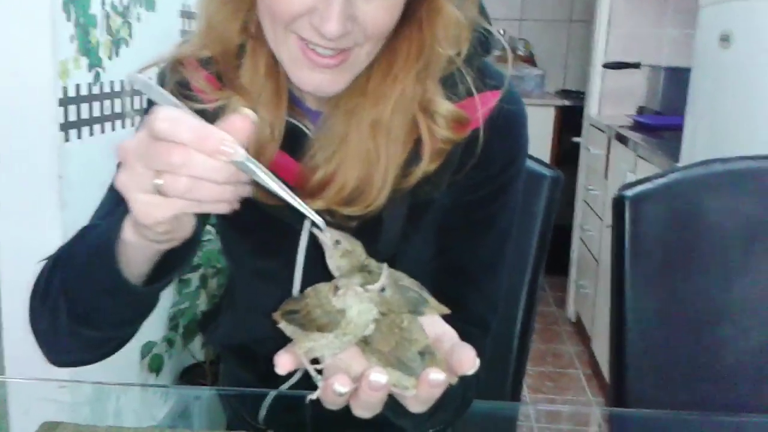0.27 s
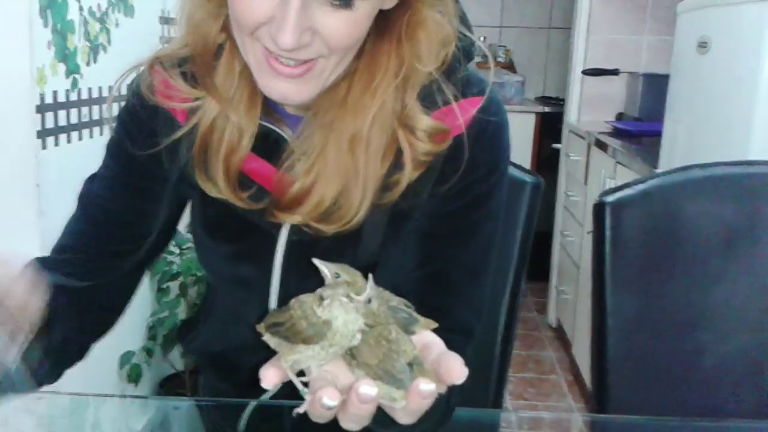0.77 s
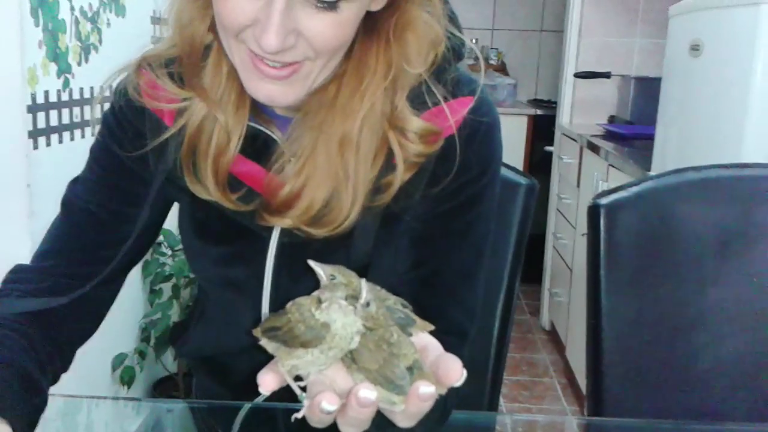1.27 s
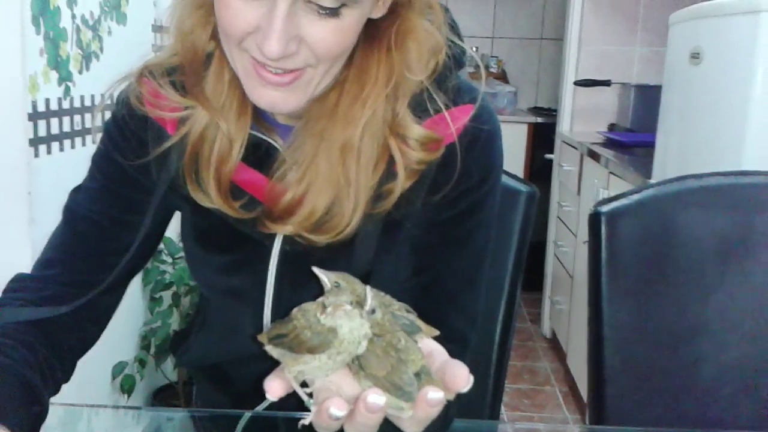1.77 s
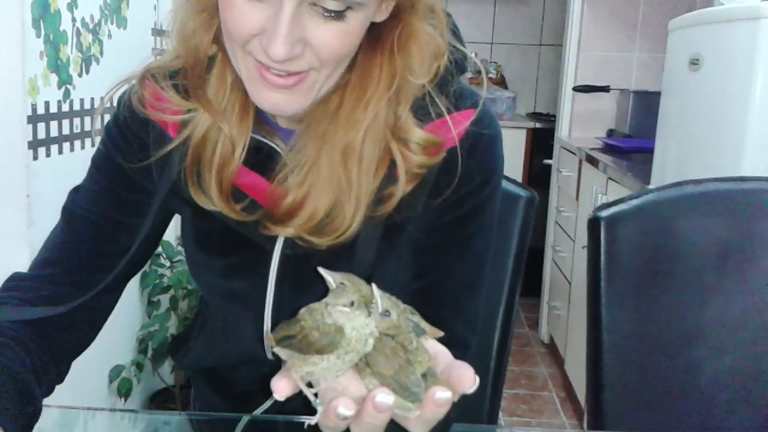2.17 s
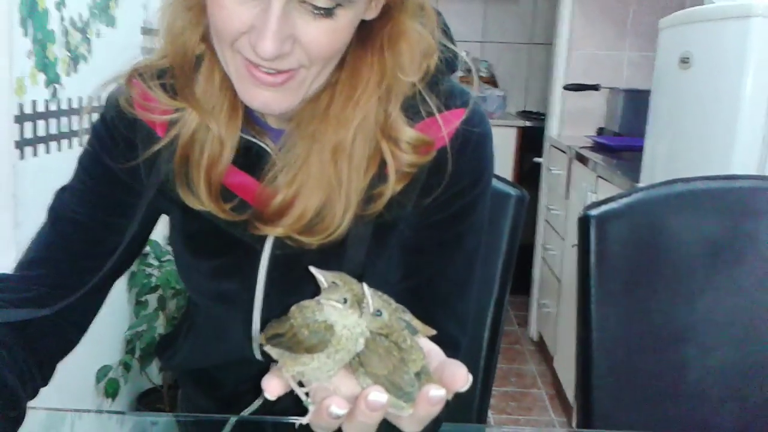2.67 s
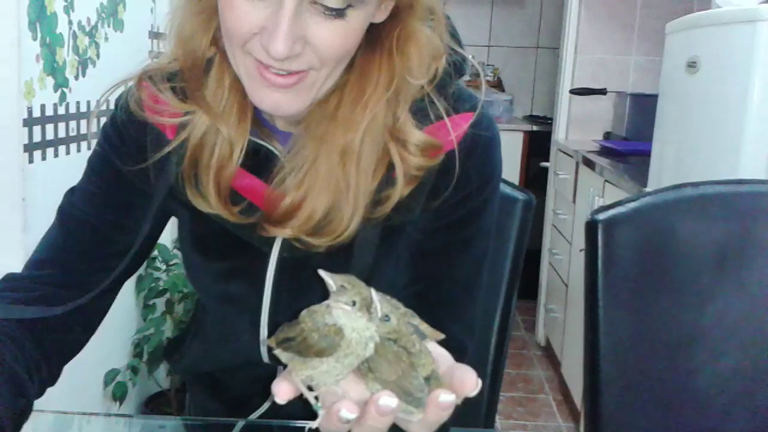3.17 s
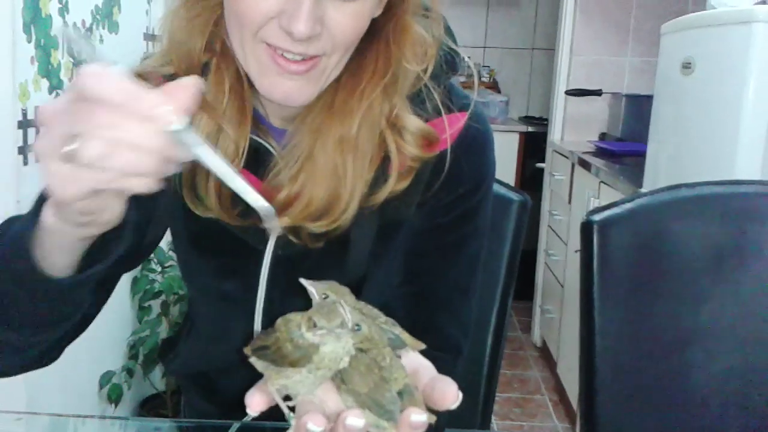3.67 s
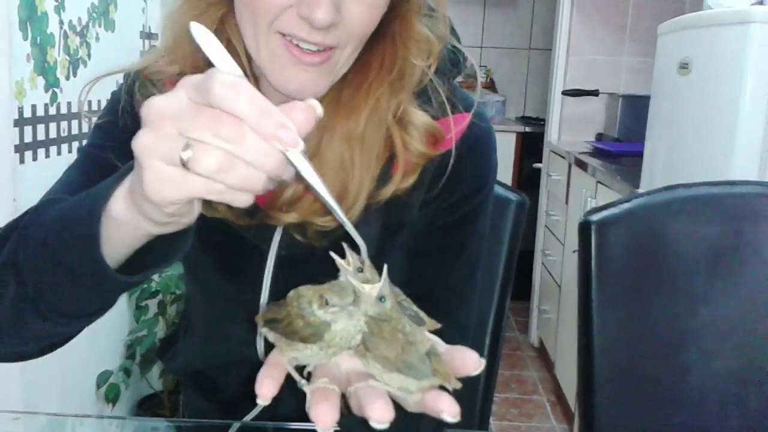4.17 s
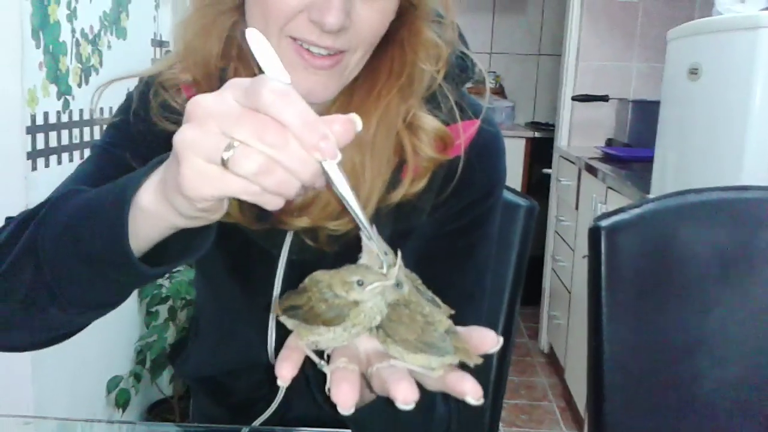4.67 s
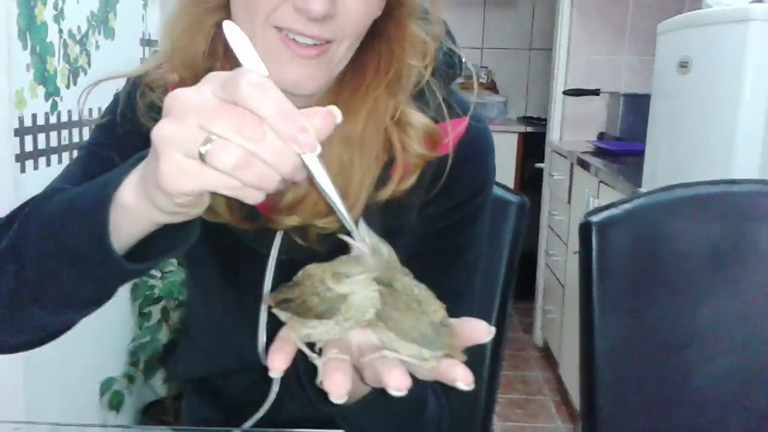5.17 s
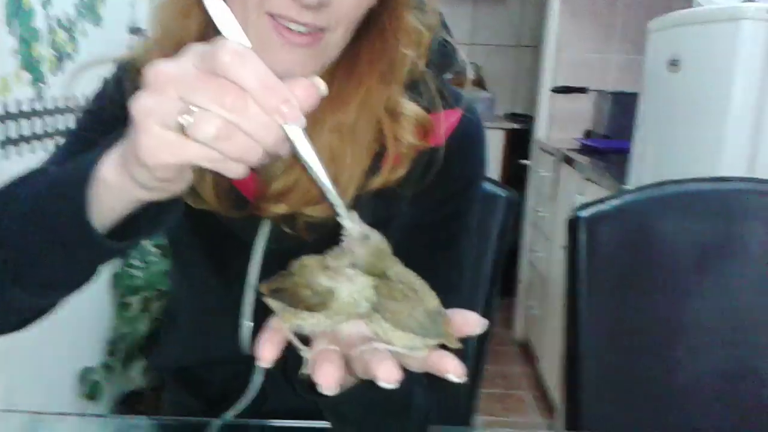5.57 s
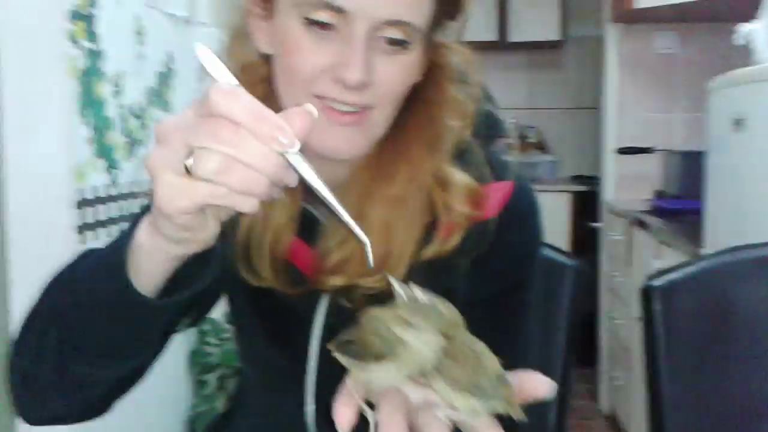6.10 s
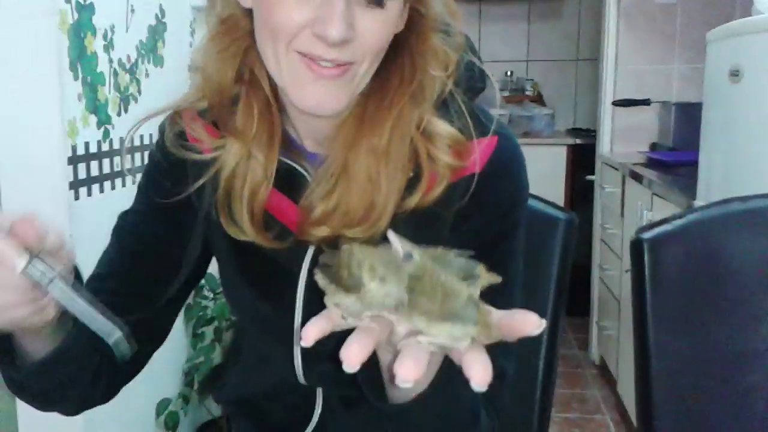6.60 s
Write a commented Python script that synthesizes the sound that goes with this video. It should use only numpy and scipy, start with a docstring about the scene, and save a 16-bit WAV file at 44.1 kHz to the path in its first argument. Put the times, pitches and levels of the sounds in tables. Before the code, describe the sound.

Two young birds give rapid, shrill, down-swept begging chirps in bursts with quiet gaps, while being fed in a hard-walled kitchen.

```python
"""Two nightingale chicks beg from a hand while being fed with tweezers in a tiled kitchen.
Most calls are a down-sweep and a few arched whistles, made by both sides of the syrinx (the voice organ):
the beak gapes wide to beg and is nearly shut to chatter. Wavering peeps and noise-burst ticks fall between.
Delayed copies and a decaying tail are the glass table and hard walls. Hiss, hum and a rustling sleeve lie
beneath, and a small microphone's noise suppressor lets the low room sound swell with the calls."""
import sys
import numpy as np
from scipy import signal
from scipy.fft import rfft, irfft
from scipy.io import wavfile
from scipy.ndimage import uniform_filter1d

SR = 44100
rng = np.random.default_rng(int(sys.argv[2]) if len(sys.argv) > 2 else 0)


def unload_audio(sound):
    """Save the sound as a 16-bit wav file, at the path given as the first command line argument."""
    columns = np.transpose(np.atleast_2d(sound))
    # keep every value between -1 and 1, then stretch to whole-number steps
    steps = np.round(np.clip(columns, -1, 1) * 32767)
    wavfile.write(sys.argv[1], SR, steps.astype(np.int16))


N = 301644  # samples in the finished sound
LEAD_S = .2  # seconds of track before time zero, cut off at the end


def undb(db):
    """Turn decibels into gain."""
    return 10 ** (np.asarray(db) / 20)


def lookup(points, hz):
    """Read (Hz, value) points on a log-frequency axis."""
    f, value = np.transpose(points)
    return np.interp(np.log(np.maximum(hz, 1)), np.log(f), value)


def colour(x, points):
    """Shape a sound by a spectrum of (Hz, dB) points."""
    gain = undb(lookup(points, np.fft.rfftfreq(len(x), 1 / SR)))
    return irfft(rfft(x) * gain, len(x))


def noise(points, size):
    """Make coloured noise with an rms of 1."""
    x = colour(rng.standard_normal(size), points)
    return x / x.std()


def wander(rate, size):
    """Draw random values, rate of them a second, joined by straight lines."""
    return np.interp(np.arange(size) * rate / SR, np.arange(size), rng.standard_normal(size))


def silence():
    """Make an empty track with its lead-in."""
    return np.zeros(N + int(LEAD_S * SR))


def add(out, s, x):
    """Mix x into out at time s; out begins LEAD_S before time zero."""
    i = int((s + LEAD_S) * SR)
    out[i:i + len(x)] += x[:max(len(out) - i, 0)]


HALF_NOTE_S = .025  # half the length of a note in seconds
# What throat and beak let through, gaping wide and barely open. Each row: frequency in Hz, level in dB.
WIDE_BEAK = [(1500, -39.5), (2500, -29), (3500, -10.5), (5000, -7), (6200, -2), (7800, 1), (9000, -7.5),
             (10500, -20.5), (12500, -33.5), (15500, -41.5)]
NARROW_BEAK = [(1500, -21), (2500, -16.5), (3700, -13), (5000, -15), (6300, 3), (7300, -2.5), (9000, -25.5),
               (10500, -23), (12500, -42.5), (15500, -21.5)]
# The colour of the air noise in the voice. Each row: frequency in Hz, relative level in dB.
RASP_COLOUR = [(100, -40.5), (1000, -36.5), (1800, -10.5), (3000, 2), (6500, 4), (9000, 1), (12000, -4),
               (14500, -8.5)]


def syllable(top_hz, fall, ratio, upper_db, lower_db, gape, round_s=.006, rise_s=0.007, climb=.45,
             jitter=.012, slack=0.036, flutter_db=3.0, mix_db=-37, rasp_db=-34, gape_rasp_db=10,
             join_hz=11300, foot_hz=2100):
    """One arch of pitch centred on its top; both sides of the syrinx follow it and fade as it falls."""
    t = np.arange(-HALF_NOTE_S, HALF_NOTE_S, 1 / SR)
    # the pitch climbs more gently than it falls, and its top is rounded
    steepness = fall * np.where(t < 0, climb, 1)
    hz = top_hz * np.exp(-steepness * (np.hypot(t, round_s) - round_s))
    gape = np.clip(gape, 0, 1)
    # a gaping chick stops its note higher up than one with a nearly closed beak
    onset = np.exp(-(np.minimum(t, 0) / rise_s) ** 2)
    release = np.clip((hz - foot_hz - 1400 * gape) / 2600, 0, 1)
    pressure = onset * release * signal.windows.tukey(len(t), .1)
    # the lower side is faint until the tension has dropped
    joined = np.clip((join_hz - hz) / 2500, .06, 1)
    # slack membranes turn rough at the foot of the arch
    unsteady = jitter + slack * np.clip((6500 - hz) / 2000, 0, 1)
    voices = 0
    for pitch, db, drive in ((hz, upper_db, pressure), (hz * ratio, lower_db, pressure * joined)):
        pitch = pitch * (1 + unsteady * wander(1500, len(t)))
        beak_db = gape * lookup(WIDE_BEAK, pitch) + (1 - gape) * lookup(NARROW_BEAK, pitch)
        gain = undb(db + beak_db + flutter_db * wander(900, len(t)))
        phase = 2 * np.pi * np.cumsum(pitch) / SR
        voices = voices + drive * gain * np.exp(1j * phase)
    # the membranes share one air stream: squaring adds octaves and a sum tone, strongest in loud notes;
    # mix_db is their level against a single voice of amplitude 0.306
    overtones = undb(mix_db) * (voices ** 2).imag / 0.306
    loudness = np.abs(voices)
    airflow = loudness.max() ** 0.04 * uniform_filter1d(loudness, size=600)
    rasp = undb(rasp_db + gape_rasp_db * gape) * airflow * noise(RASP_COLOUR, len(t))
    return voices.imag + overtones + rasp


# For sweep and arch: rate of pitch fall per second, lower voice pitch / upper voice pitch,
# lower voice in dB against the upper, rise in seconds.
SWEEP_FALL, SWEEP_RATIO, SWEEP_LOWER_DB, SWEEP_RISE_S = 100, .69, -3, 0.0044
ARCH_FALL, ARCH_RATIO, ARCH_LOWER_DB, ARCH_RISE_S = 165, .67, -5.5, .004
BEG_BEAT_S = .0232  # seconds between arches
# Share of pitch lost from one arch to the next in a call at least this loud; quieter calls lose less.
BEG_SAG, FULL_EFFORT_DB = 0.2, -8


def beg(count, gap_s, sweep_hz, arch_hz, db, swell_db, gape):
    """A begging call: a long sweep, then arches that step down in pitch, further the harder the chick calls."""
    notes = [syllable(sweep_hz, SWEEP_FALL, SWEEP_RATIO, db, db + SWEEP_LOWER_DB, gape,
                      rise_s=SWEEP_RISE_S, round_s=.0065, foot_hz=2600, jitter=.018, slack=.05,
                      flutter_db=3.5, rasp_db=-34, join_hz=12080)]
    sag = BEG_SAG * min(undb(db - FULL_EFFORT_DB), 1)
    for k in range(1, int(round(count))):
        note_db = db + k * swell_db
        top_hz = arch_hz * (1 - sag) ** (k - 1)
        notes.append(syllable(top_hz, ARCH_FALL, ARCH_RATIO, note_db, note_db + ARCH_LOWER_DB, gape,
                              rise_s=ARCH_RISE_S, round_s=.006, climb=.55, foot_hz=1900,
                              jitter=.014, slack=.055, flutter_db=3, rasp_db=-34))
    return phrase(notes, gap_s, BEG_BEAT_S, room_db=-2.5)


# For sweep and arch: top in Hz, rate of pitch fall per second, lower voice pitch / upper voice pitch.
CHATTER_SWEEP_HZ, CHATTER_SWEEP_FALL, CHATTER_SWEEP_RATIO = 13450, 178, .8
CHATTER_ARCH_HZ, CHATTER_ARCH_FALL, CHATTER_ARCH_RATIO = 9030, 190, .7
# One voice in dB against the other, and how wide the beak gapes from 0 to 1.
CHATTER_SWEEP_LOWER_DB, CHATTER_SWEEP_GAPE = -3.5, 0.033
CHATTER_ARCH_UPPER_DB, CHATTER_ARCH_GAPE = 0.5, 0.24
CHATTER_GAP_S, CHATTER_BEAT_S = 0.025, .0218  # seconds from sweep to first arch; between arches


def chatter(count, db, swell_db):
    """A dry rattle through a nearly shut beak: a quick sweep, then arches all of one pitch."""
    notes = [syllable(CHATTER_SWEEP_HZ, CHATTER_SWEEP_FALL, CHATTER_SWEEP_RATIO,
                      db, db + CHATTER_SWEEP_LOWER_DB, CHATTER_SWEEP_GAPE,
                      rise_s=.003, foot_hz=3040, jitter=.02, slack=0.061,
                      flutter_db=3, mix_db=-39, rasp_db=-33)]
    for k in range(1, int(round(count))):
        note_db = db + k * swell_db
        notes.append(syllable(CHATTER_ARCH_HZ, CHATTER_ARCH_FALL, CHATTER_ARCH_RATIO,
                              note_db + CHATTER_ARCH_UPPER_DB, note_db, CHATTER_ARCH_GAPE,
                              rise_s=0.00255, round_s=.006, foot_hz=2300, jitter=.018, slack=0.056,
                              flutter_db=3, mix_db=-41, rasp_db=-34))
    return phrase(notes, CHATTER_GAP_S, CHATTER_BEAT_S, room_db=-7)


# Rate of pitch fall per second, lower / upper voice pitch, lower voice in dB against the upper, gape 0 to 1.
SQUEAK_FALL, SQUEAK_RATIO, SQUEAK_LOWER_DB, SQUEAK_GAPE = 165, .64, -4, 0.55


def squeak(top_hz, db):
    """One low arch on its own, sung by both sides of the syrinx."""
    note = syllable(top_hz, SQUEAK_FALL, SQUEAK_RATIO, db, db + SQUEAK_LOWER_DB, SQUEAK_GAPE,
                    slack=.05, rasp_db=-29.5)
    return phrase([note], 0, 0, room_db=-4.0)


def phrase(notes, gap_s, beat_s, room_db):
    """String notes into one call in the room: the opening note, a gap, then the others on an even beat."""
    out = np.zeros(int(.8 * SR))  # room for the call and its echo
    for k, note in enumerate(notes):
        i = int((gap_s + (k - 1) * beat_s) * SR) if k else 0
        out[i:i + 2 * len(note)] += bounced(note)
    return kitchen(out, room_db=room_db)


# All times here are when the first note reaches its top; levels are those before the beak shapes them.
# Begging calls. Each row: time in seconds, number of notes, seconds from sweep to first arch,
# sweep top in Hz, arch top in Hz, level in dB, change in dB per note, gape from 0 to 1.
BEGGING_CALLS = [(-.092, 2, 0.036, 12660, 7900, -7.5, -1, 0.92),
                 (0.0636, 2, 0.033, 12770, 7730, -11, 2.5, 0.82),
                 (0.2081, 2, 0.031, 12940, 7870, -10, 3, 0.73),
                 (0.3596, 2, 0.031, 12310, 7980, -9.5, 2, 0.8),
                 (0.5103, 2, 0.032, 12500, 7770, -10, 2, 0.89),
                 (0.6662, 2, .0321, 12640, 7780, -9.5, 2, 0.89), (.851, 2, 0.031, 12800, 6780, -9, -1, .75),
                 (3.695, 2, 0.03, 11800, 9000, -29.5, 4, .4),
                 (3.852, 4, 0.027, 11320, 8250, -18.5, 1.36, 0.99),
                 (4.0193, 4, .031, 13000, 8460, -10, -1, 0.98), (4.165, 3, 0.033, 12970, 8220, -9.5, 0, 1),
                 (4.309, 3, 0.029, 12800, 7950, -8.5, 0, 0.79),
                 (4.465, 2, .0338, 12780, 7800, -8.5, -0.5, 0.9),
                 (4.6043, 3, 0.03, 12670, 7770, -8, -2.5, 0.8),
                 (4.748, 2, 0.031, 12380, 7780, -8.5, 1.5, .62),
                 (6.079, 2, .028, 11440, 7510, -24.5, 5, 0.17),
                 (6.5526, 3, 0.027, 12150, 7990, -27, 4, 0.3),
                 (6.799, 2, 0.028, 10600, 6410, -23.5, 3, 0.28)]
# Chatters. Each row: time in seconds, number of notes, level in dB, change in dB per note.
CHATTER_CALLS = [(.6033, 2, -13, -6.5), (1.8385, 3, -27.5, 0), (1.937, 1, -10, 0), (2.0547, 3, -8.5, -5.5),
                 (2.841, 4, -30, 2.5), (3.0194, 3, -13, -1), (5.3596, 2, -21.5, -4),
                 (5.487, 3, -11.5, -5.5), (5.6453, 3, -11.5, -8.5)]
# Squeaks, most of them as a chick takes the food. Each row: time in seconds, top in Hz, level in dB.
SQUEAK_CALLS = [(3.2994, 6200, -22.5), (4.909, 6500, -20.5), (4.928, 6800, -13.5), (4.9395, 5960, -13.5),
                (4.9493, 4960, -14), (5.266, 8500, -36.5)]


def begging():
    """All the calls of both chicks; they fidget, so the room answers each call a little differently."""
    out = silence()
    for call, table in ((beg, BEGGING_CALLS), (chatter, CHATTER_CALLS), (squeak, SQUEAK_CALLS)):
        for s, *shape in table:
            add(out, s - HALF_NOTE_S, call(*shape))
    return out


PEEP_RATIO = 1.47  # second voice pitch / first voice pitch
# Soft peeps with the beak nearly shut. Each row: start in seconds, length in seconds,
# start pitch in Hz, end pitch in Hz, peak level of the first voice in dB, second voice in dB against it.
PEEPS = [(1.465, .07, 3480, 3500, -68, 9), (2.39, .11, 3000, 3480, -63, -10),
         (3.235, .055, 3520, 3500, -50, -11), (5.19, .08, 4100, 4300, -58, -3),
         (5.585, .06, 3500, 3440, -59, -13), (5.965, .08, 3600, 3550, -62, -13),
         (6.69, .06, 3550, 3500, -57, -12)]


def peeps(quaver=0.035, octave_db=-14):
    """Thin, unsteady two-voiced whistles that swell and fade."""
    out = silence()
    for s, length, start_hz, end_hz, db, second_db in PEEPS:
        n = int(length * SR)
        pitch = np.linspace(start_hz, end_hz, n) * (1 + quaver * wander(1100, n))
        phase = 2 * np.pi * np.cumsum(pitch) / SR
        first = np.sin(phase) + undb(octave_db) * np.sin(2 * phase)
        second = undb(second_db) * np.sin(PEEP_RATIO * phase)
        swell = np.sin(np.linspace(0, np.pi, n))
        add(out, s, undb(db) * (first + second) * swell)
    return out


# The colours of tick and knock. Each row: frequency in Hz, relative level in dB.
TICK_COLOUR = [(50, -44.5), (300, -28), (1200, -29.5), (2200, -5), (3200, -5.5), (4400, 2.5), (6300, -1.5),
               (9000, -15), (15000, -34)]
KNOCK_COLOUR = [(40, -36), (120, -4.5), (350, 3), (800, -12.5), (1500, -14), (4000, -17.5)]
# Ticks of tweezers and beaks, levels before the low cut.
# Each row: start in seconds, tick level in dB, dull knock level in dB.
TICKS = [(1.1131, -33, -68), (1.3272, -43, -64), (3.2943, -29.5, -45), (4.584, -39, -46.5),
         (5.626, -54.5, -49)]


def ticks(tick_s=0.0043, knock_s=0.0025, lowest_hz=220):
    """A sharp contact with a short dull knock under it: two bursts of noise that die away."""
    out, t = silence(), np.arange(2048) / SR
    for s, db, knock_db in TICKS:
        tick = noise(TICK_COLOUR, len(t)) * np.exp(-t / tick_s)
        knock = noise(KNOCK_COLOUR, len(t)) * np.exp(-t / knock_s)
        add(out, s, undb(db) * tick + undb(knock_db) * knock)
    return signal.sosfilt(signal.butter(2, lowest_hz, "high", fs=SR, output="sos"), out)


# Early bounces off the hand, glass table and nearby wall.
# Each row: typical delay in seconds, level in dB against the direct sound.
BOUNCES = [(.0011, -9.5), (.0028, -10.5), (.0047, -18), (.0083, -15.5), (.013, -15)]


def bounced(x, sway=.15):
    """Add the early bounces; their paths change as the head moves, so each note is combed differently."""
    x = np.pad(x, (0, len(x)))
    out = x.copy()
    for delay_s, db in BOUNCES:
        lag = max(int(delay_s * SR * np.exp(sway * rng.standard_normal())), 1)
        out[lag:] += undb(db) * x[:-lag]
    return out


# The colour of the kitchen's echo. Each row: frequency in Hz, relative level in dB.
ROOM_COLOUR = [(200, -8.5), (2000, 6), (3500, 5.5), (5000, 5), (6500, -3), (8000, -0.5), (10000, 5.5),
               (15000, 6)]
# How long the echo lasts. Each row: frequency in Hz, time to fall by 60 dB in seconds.
ROOM_DECAY = [(200, 0.94), (3000, 0.3), (6000, 0.31), (9000, 0.33), (15000, 0.12)]


def kitchen(x, direct_db=-1, room_db=-3, build_s=.003):
    """The direct sound and a dense echo tail off the hard walls, whose highest treble dies first."""
    t = np.arange(int(.8 * SR)) / SR
    hz = np.fft.rfftfreq(len(t), 1 / SR)
    spectrum = rfft(colour(rng.standard_normal(len(t)), ROOM_COLOUR))
    centres, t60s = np.transpose(ROOM_DECAY)
    tail = np.zeros(len(t))
    # overlapping bands, each fading at its own speed
    for band, t60 in zip(np.eye(len(centres)), t60s):
        band_noise = irfft(spectrum * np.interp(hz, centres, band), len(t))
        tail += band_noise * undb(-60 * t / t60)
    tail *= 1 - np.exp(-(t / build_s) ** 2)
    response = undb(room_db) * tail / np.sqrt(np.sum(tail ** 2))
    response[0] += undb(direct_db)
    return signal.fftconvolve(x, response)[:len(x)]


# All levels here are those before the noise suppressor.
# The colour of the quiet kitchen's hiss. Each row: frequency in Hz, relative level in dB.
HISS_COLOUR = [(25, -13.5), (100, -17.5), (250, -14), (400, -14.5), (750, -20.5), (1300, -20), (1900, -9.5),
               (2600, -21), (5000, -11.5), (9000, -20.5), (15500, -19.5)]
HISS_DB = -67  # average level in dB
# The faint hum. Each row: frequency in Hz, level in dB.
HUM = [(248, -84.5), (640, -84.5)]
# The sleeve rustles as the arm moves. Each row: time in seconds, level in dB; it glides between rows.
SLEEVE = [(0, -63.5), (.4, -61.5), (1.1, -71), (1.7, -84.5), (2.1, -65.5), (2.7, -80), (3.9, -69.5),
          (5.6, -68.5), (6.3, -80.5), (6.84, -63.5)]


def background():
    """Faint hiss and hum of the kitchen, and the dull rustle of a sleeve: coloured noise and sines."""
    t = np.arange(N) / SR
    hiss = noise(HISS_COLOUR, N) * undb(HISS_DB + 1.0 * wander(7.6, N))
    hum = sum(undb(db) * np.sin(2 * np.pi * hz * t) for hz, db in HUM)
    # colour of the cloth in (Hz, dB) points
    cloth = noise([(50, -15.5), (130, -4.0), (350, -3.5), (800, -11.5), (1600, -3),
                   (3000, -10.5), (9000, -33)], N)
    sleeve_db = np.interp(t, *np.transpose(SLEEVE)) + 1.5 * wander(25, N)
    return hiss + hum + cloth * undb(sleeve_db)


def scene():
    """Chicks and tweezers in the kitchen, over its faint background."""
    calls = begging()
    small_sounds = kitchen(peeps() + ticks())
    return ((calls + small_sounds)[-N:] + background())[None]


TOP_HZ = 15600  # the microphone's upper limit


def record(dry, open_db=13, knee_db=-30, hold_s=0.049, split_hz=2000):
    """The noise suppressor eases off the low band while the sound is loud; the top is cut."""
    pole = np.exp(-1 / (hold_s * SR))
    loudness = np.maximum(signal.lfilter([1 - pole], [1, -pole], np.abs(dry)), 1e-9)
    # near 0 when quiet, nearing 1 when loud
    opening = (loudness / (loudness + undb(knee_db))) ** 0.23
    low = signal.sosfiltfilt(signal.butter(3, split_hz, fs=SR, output="sos"), dry)
    eased = dry + (undb(open_db * opening) - 1) * low
    return signal.sosfilt(signal.ellip(8, .2, 70, TOP_HZ, fs=SR, output="sos"), eased)


dry = scene()
out = record(dry)
unload_audio(out)
```